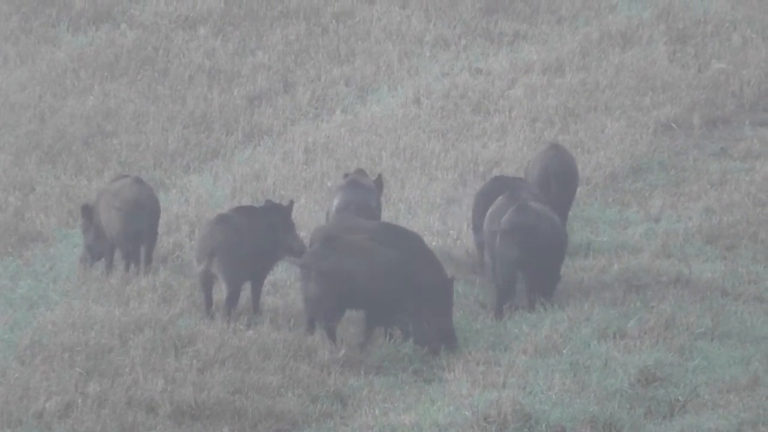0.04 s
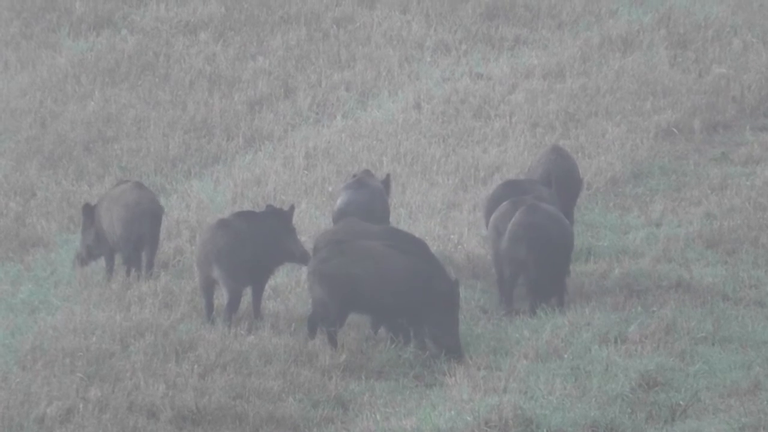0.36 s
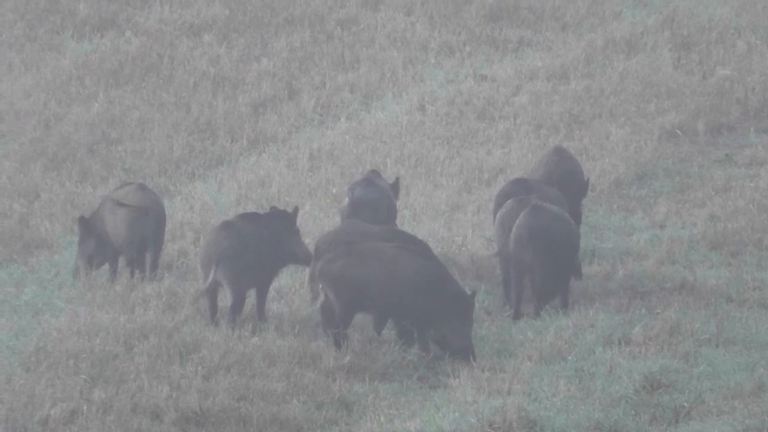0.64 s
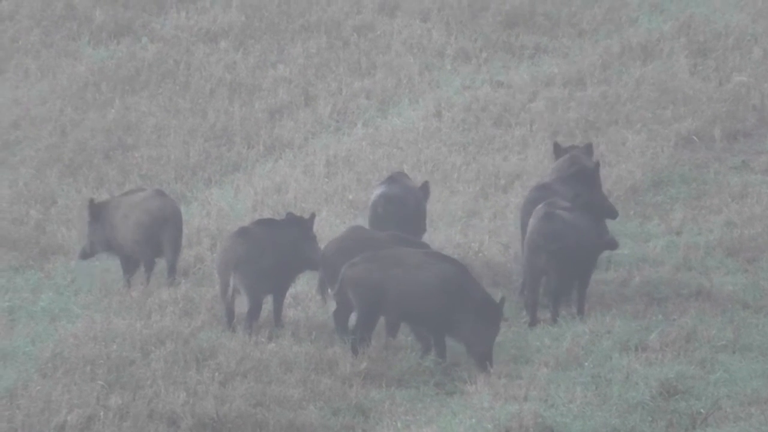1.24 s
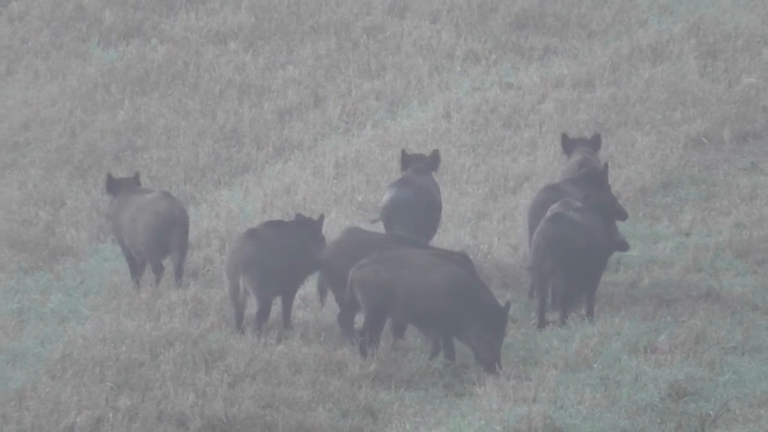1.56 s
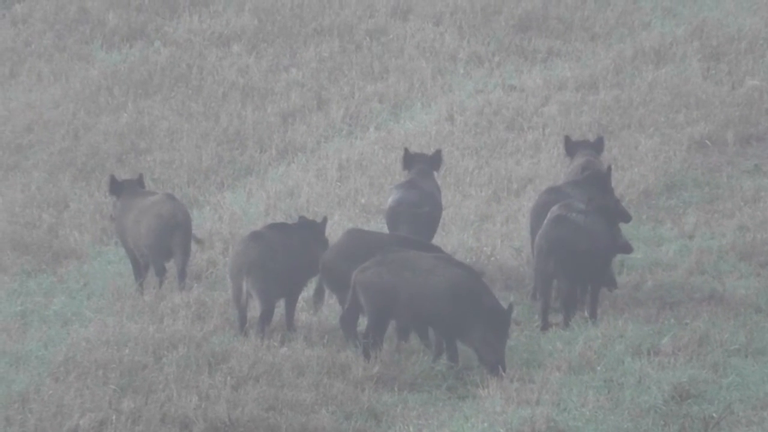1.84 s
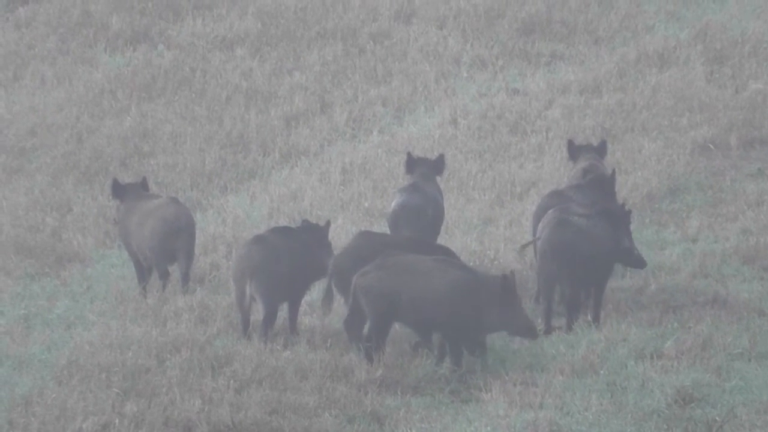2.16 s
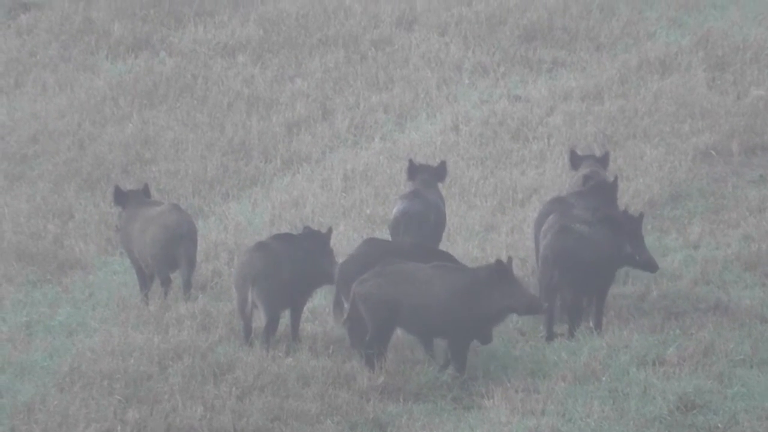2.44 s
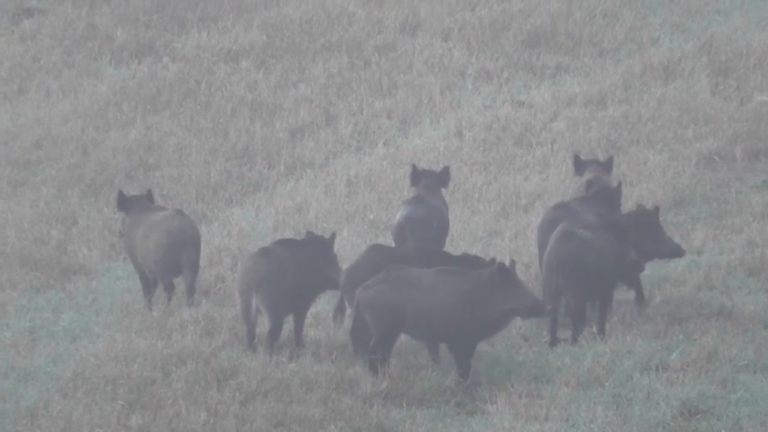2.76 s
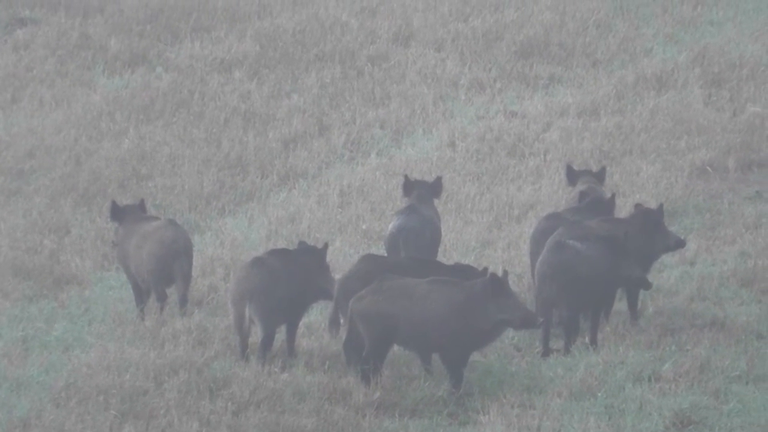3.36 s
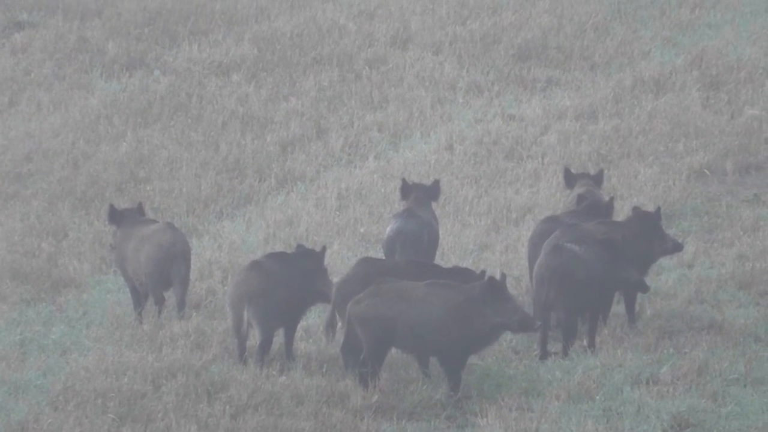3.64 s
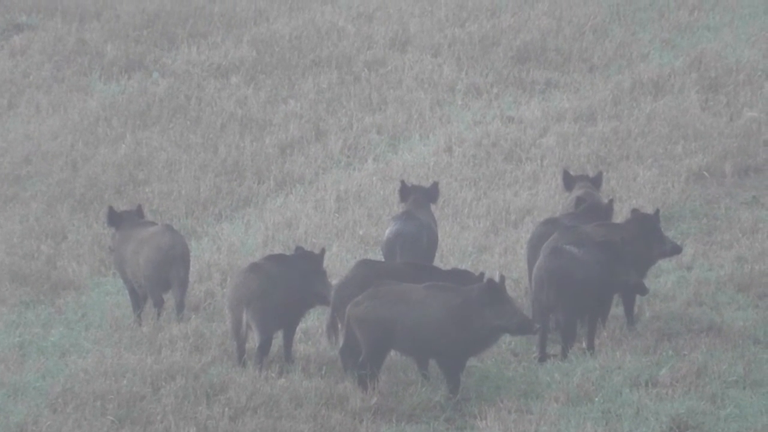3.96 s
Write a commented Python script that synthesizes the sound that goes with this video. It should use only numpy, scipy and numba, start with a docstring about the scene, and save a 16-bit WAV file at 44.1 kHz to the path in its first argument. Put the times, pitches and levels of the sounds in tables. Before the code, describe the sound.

A stag's drawn-out bellow rises out of soft wind hiss and faint, distant birdsong.

```python
"""A foggy hillside, with a red deer stag roaring to the right of a stereo microphone. Slow glottal pulses
speed up into a clear bellow while the larynx sinks, so that sharp throat resonances slide down through
the harmonics and light them up one after another. Breath rasps over it and the slope echoes faintly.
A small bird sings far off, behind steady air and the hum of a camera."""
import sys
import numpy as np
from scipy import signal
from scipy.fft import rfft, irfft
from scipy.io import wavfile
from scipy.ndimage import uniform_filter1d
from numba import njit

SR = 44100
rng = np.random.default_rng(int(sys.argv[2]) if len(sys.argv) > 2 else 0)


def generate_wav(sig):
    """Save sig (samples, or channels by samples) to the path in sys.argv[1] as 16-bit PCM at SR."""
    pcm = np.round(np.clip(np.atleast_2d(sig).T, -1, 1) * 32767).astype(np.int16)
    wavfile.write(sys.argv[1], SR, pcm)


N = 176400
TIME = np.arange(N) / SR
ROAR_START_S = 2.595


def stag():
    """The roar, right of the microphone: pulses ring the lengthening throat, and breath rides on top."""
    # One list per sharp resonance, lowest first. Each row: time in seconds, centre in Hz, gain in dB.
    throat = [
        [(2.6, 620, -54), (2.796, 600, -54), (2.866, 586, -53), (3.022, 517, -50.5), (3.076, 437, -64),
         (3.181, 419, -53.5), (3.352, 411, -45), (3.6, 360, -78)],
        [(2.6, 1110, -49), (2.792, 1080, -45), (2.91, 950, -40), (2.992, 903, -34), (3.051, 824, -31.5),
         (3.138, 713, -35), (3.196, 643, -35.5), (3.265, 581, -36.5), (3.343, 474, -65), (3.55, 486, -60.5),
         (3.78, 470, -47), (4.0, 482, -48)],
        [(2.6, 1506, -46), (2.754, 1482, -37.5), (2.862, 1404, -44), (2.96, 1346, -49), (3.05, 1230, -73),
         (3.16, 1050, -42), (3.228, 1013, -39.5), (3.28, 927, -39), (3.32, 890, -35), (3.36, 889, -29),
         (3.39, 867.4, -33.5), (3.556, 846, -43.5), (3.8, 809, -45.5), (4.0, 790, -43.5)],
        [(2.6, 1710, -59.5), (2.88, 1588, -47.5), (2.978, 1630, -47.5), (3.04, 1640, -38.5),
         (3.094, 1556, -37.5), (3.18, 1432, -35.5), (3.21, 1325, -65), (3.255, 1096, -48), (3.285, 1032, -30),
         (3.33, 1043, -44.5), (3.4, 960, -55), (3.65, 1027, -58.5), (3.93, 1015, -51)],
        [(2.7, 1760, -75), (2.872, 1765, -51.5), (2.982, 1730, -48), (3.08, 1830, -68), (3.163, 1694, -61),
         (3.227, 1750, -50), (3.283, 1612, -52), (3.355, 1507, -41), (3.42, 1400, -75), (3.48, 1190, -60.5),
         (3.66, 1174, -54), (3.74, 1180, -66), (4.0, 1120, -68)],
        [(2.9, 2350, -77), (2.983, 2280, -54), (3.067, 2126, -46), (3.141, 1994, -53.5), (3.331, 1860, -65),
         (3.425, 1793, -53), (3.5, 1720, -63), (3.68, 1620, -62), (3.85, 1524, -55), (3.99, 1430, -46.5)],
    ]
    # Damping of those resonances. Each row: time in seconds, bandwidth in Hz.
    throat_width = [(2.6, 92), (2.798, 66.6), (2.923, 52), (3.02, 34.8), (3.36, 20), (3.548, 52),
                    (3.999, 62.5)]
    # One list per upper resonance. Each row: time in seconds, centre in Hz, gain in dB.
    upper_throat = [
        [(2.78, 3080, -67), (3.02, 3550, -71.5), (3.18, 3360, -69), (3.26, 3290, -57.5), (3.35, 3090, -63),
         (3.55, 3060, -54), (3.67, 3090, -56.5), (3.78, 3140, -70), (3.97, 3130, -63.5)],
        [(3.0, 2700, -69.5), (3.35, 2770, -74), (3.55, 2750, -55.5), (3.7, 2680, -62), (3.8, 2740, -64.5),
         (3.97, 2660, -63)],
        [(3.35, 3730, -80), (3.55, 3545, -64), (3.7, 3560, -66.5), (3.85, 3390, -73)],
    ]
    source, phase = vocal_folds()
    body = vocal_tract(source, throat, width_hz=curve(throat_width))
    body = cut(body, 340, "high", order=4)
    body = cut(body, 1800, "low", order=5)
    upper = vocal_tract(source, upper_throat, width_hz=np.full(N, 60.))
    upper = cut(upper, 2000, "high", order=2)
    fundamental = undb(-60) * np.sin(phase) * fade_in(start_s=3.2, rise_s=.059)
    rasp, hiss = breath(phase)
    return pan(flutter(body) + fundamental, -5) + pan(upper + hiss, -1.7) + pan(rasp, -6)


def vocal_folds():
    """Glottal pulses with a puff of turbulence in each cycle; also returns their phase."""
    # Pulse rate of the folds. Each row: time in seconds, rate in Hz.
    pitch = [(2.595, 45), (2.625, 63), (2.64, 74), (2.665, 83), (2.70, 87), (2.75, 92), (2.79, 100),
             (2.82, 112), (2.85, 117.5), (2.96, 123), (2.994, 127.3), (3.05, 139.5), (3.074, 141.4),
             (3.156, 144), (3.252, 144.8), (3.292, 147.3), (3.372, 150), (3.47, 150.3), (3.618, 149),
             (3.806, 144.2), (4.0, 140.7)]
    # Strength of the pulses as the roar starts. Each row: time in seconds, gain in dB.
    effort = [(2.595, -9), (2.62, -4.5), (2.67, -2), (2.74, 1), (2.85, 3)]
    jitter, shimmer_db, rough_db = .002, .7, -23
    hz = curve(pitch) * (1 + jitter * walk(90))
    phase = 2 * np.pi * np.cumsum(hz) / SR
    phase -= phase[int(ROAR_START_S * SR)]
    # The harmonics fade out between 4200 and 4800 Hz.
    pulses = sum(np.cos(k * phase) * np.clip((4800 - k * hz) / 600, 0, 1) for k in range(1, 64))
    puffs = unit(rng.standard_normal(N) * (3.6 + np.cos(phase))) * np.sqrt(SR / hz) / 2
    strength = undb(curve(effort) + shimmer_db * walk(60)) * (TIME > ROAR_START_S - .005)
    return (pulses + undb(rough_db) * puffs) * strength * hz / hz.max(), phase


def vocal_tract(source, resonances, width_hz):
    """Sliding throat resonances side by side, each with its own polarity."""
    polarity = (1, -1, -1, 1, -1, 1)
    return sum(sign * undb(curve(rows, column=2)) * resonate(source, curve(rows), width_hz)
               for sign, rows in zip(polarity, resonances))


def flutter(body):
    """Late in the roar its lowest harmonics swell and dip quickly."""
    crest_s, rate_hz, depth, edge_hz = 3.72, 11.3, .7, 480
    lows = signal.sosfiltfilt(signal.butter(5, edge_hz, fs=SR, output="sos"), body)
    swing = depth * np.cos(2 * np.pi * rate_hz * (TIME - crest_s))
    return body + lows * swing * fade_in(start_s=crest_s - .13, rise_s=.13)


def breath(phase):
    """The stag's breath: a rasp that beats with the folds, and a hiss with one brief late puff."""
    # Course of the rasp. Each row: time in seconds, level in dB.
    rasp_level = [(2.6, -82), (2.76, -78), (2.93, -75), (2.97, -59), (3.01, -68.5), (3.2, -66.5),
                  (3.5, -77), (3.6, -65), (3.7, -63), (3.78, -59), (3.865, -54.5), (3.92, -66), (4.0, -72)]
    # Spectra of the three breath noises. Each row: frequency in Hz, relative density in dB.
    rasp_colour = [(300, -15), (700, -13), (1600, -14), (1950, -2), (2300, 1), (2550, -20.5), (3400, -16),
                   (5000, -24), (8000, -35), (15000, -48)]
    hiss_colour = [(300, 3), (700, 10.5), (1500, 6), (3500, -6), (7000, -15.5), (15000, -17.5)]
    puff_colour = [(2000, -15), (4000, 2), (6500, -3), (10000, -17)]
    puff_at_s, puff_width_s = 3.872, .014
    opening = fade_in(ROAR_START_S, rise_s=.19)
    rasp = undb(curve(rasp_level)) * noise(rasp_colour) * (1 + .37 * np.cos(phase)) * opening
    hiss = undb(-62) * noise(hiss_colour) * opening
    puff = undb(-74) * noise(puff_colour) * np.exp(-((TIME - puff_at_s) / puff_width_s) ** 2)
    return rasp, hiss + puff


def hillside(roar):
    """Scattered echoes off the slope, different in each channel; the lows return later and last longer."""
    t = np.arange(SR) / SR

    def tail(t60_s, rise_s):
        shape = undb(-60 * t / t60_s) * np.clip(t / rise_s, 0, 1)
        return rng.standard_normal((2, SR)) * shape / np.sqrt(np.sum(shape ** 2))

    near = undb(-20) * cut(tail(t60_s=.9, rise_s=.023), 2800, "low", order=1)
    far = undb(-8) * cut(tail(t60_s=1.6, rise_s=.2), 520, "low", order=4)
    return signal.fftconvolve(roar, near + far, axes=1)[:, :N]


def bird():
    """A faint two-note song from far off: short whistles that waver and sag a little."""
    # The whistles. Each row: start in seconds, pitch in Hz, peak level in dB.
    notes = [(.03, 3240, -64.5), (.05, 4680, -72), (.17, 3250, -65.5), (.19, 4720, -71), (.32, 3250, -67),
             (.34, 4830, -74), (.46, 3240, -66), (.615, 4780, -70), (.635, 3100, -69), (.745, 3240, -73),
             (.75, 4800, -72), (.895, 4880, -75), (1.035, 4900, -73), (1.045, 3300, -69), (1.51, 3720, -70),
             (1.81, 3800, -70)]
    note_s, fall_hz_per_s = .055, 700
    waver_hz = 15.7 * walk(70)
    song = np.zeros(N)
    for start, hz, db in notes:
        age = np.clip(TIME - start, 0, note_s)
        pitch = hz + waver_hz + fall_hz_per_s * (note_s / 2 - age)
        song += undb(db) * np.sin(np.pi * age / note_s) * np.sin(2 * np.pi * np.cumsum(pitch) / SR)
    return song


def air():
    """Steady wind and hiss around the microphone, widest in the low mids and narrower in the treble."""
    # Spectrum of the open air. Each row: frequency in Hz, relative density in dB.
    air_colour = [(15, -63), (25, -42), (59, -3), (133, -0.5), (173, -4.5), (209, -3), (322, -10.5),
                  (349, -10.5), (378, -11), (895, -14.5), (1080, -16.5), (1170, -16), (1340, -20.5),
                  (1490, -16.5), (2490, -23), (3250, -19.5), (7290, -31.5), (13500, -38), (15500, -40)]
    # Likeness of left and right. Each row: frequency in Hz, correlation.
    likeness = [(60, 0.34), (130, 0.38), (250, -0.42), (500, -0.61), (1000, -0.26), (2000, 0.15),
                (4000, 0.8), (8000, 0.75), (13000, .25)]
    alike = over_hz(likeness)
    mid = noise(air_colour)
    side = noise(air_colour, weight=np.sqrt((1 - alike) / (1 + alike)))
    flicker_db = .425 * walk(6.58)
    return pan(np.array([mid + side, mid - side]), -.5) * undb(-58 + flicker_db)


def camera_hum():
    """Faint wavering tones of the camera: narrow bands of noise, separate in each channel."""
    # The tones. Each row: centre in Hz, bandwidth in Hz, rms level in dB.
    tones = [(128, 5.8, -87.5), (214.3, 10.8, -67.5), (348.2, 7.3, -73), (14400, 99, -91.5)]
    hum = np.zeros((2, N))
    for hz, width, db in tones:
        for channel in hum:
            band = resonate(rng.standard_normal(N), np.full(N, float(hz)), np.full(N, float(width)))
            channel += undb(db) * unit(band)
    return hum


def undb(db):
    return 10 ** (np.asarray(db) / 20)


def unit(x):
    return x / np.sqrt(np.mean(x ** 2))


def pan(x, left_over_right_db):
    return x * undb(np.array([[left_over_right_db], [-left_over_right_db]]) / 2)


def fade_in(start_s, rise_s):
    return np.clip((TIME - start_s) / rise_s, 0, 1)


def cut(x, hz, kind, order):
    return signal.sosfilt(signal.butter(order, hz, kind, fs=SR, output="sos"), x)


def curve(rows, column=1):
    """One column of a table, joined by straight lines in time."""
    rows = np.array(rows, float)
    return np.interp(TIME, rows[:, 0], rows[:, column])


def over_hz(points):
    """(Hz, value) points spread over the bins of a spectrum."""
    hz, value = np.array(points, float).T
    return np.interp(np.log(np.fft.rfftfreq(N, 1 / SR) + 1), np.log(hz), value)


def noise(colour, weight=1):
    """Noise of a given colour, rms 1 before the weight."""
    gain = unit(undb(over_hz(colour)))
    return irfft(rfft(rng.standard_normal(N)) * gain * weight, N)


def walk(rate_hz):
    """Random drift with rms 1, gliding to a new value rate_hz times a second."""
    hold = int(SR / rate_hz)
    steps = np.repeat(rng.standard_normal(N // hold + 1), hold)
    return unit(uniform_filter1d(steps, hold)[:N])


@njit
def resonate(x, hz, width_hz):
    """Moving state-variable band-pass, gain 1 at the centre."""
    y = np.empty(len(x))
    band_state, low_state = 0., 0.
    for i in range(len(x)):
        g = np.tan(np.pi * hz[i] / SR)
        damping = width_hz[i] / hz[i]
        band = (band_state + g * (x[i] + 1e-18 - low_state)) / (1 + g * (g + damping))
        band_state = 2 * band - band_state
        low_state += 2 * g * band
        y[i] = damping * band
    return y


def scene():
    """At the microphone: the stag and its echo over the quiet hillside."""
    roar = stag()
    return roar + hillside(roar) + bird() + air() + camera_hum()


def record(dry):
    """The recorder cuts the top steeply above 15.7 kHz."""
    return signal.sosfilt(signal.ellip(10, .2, 70, 15700, fs=SR, output="sos"), dry)


dry = scene()
out = record(dry)
generate_wav(out)
```